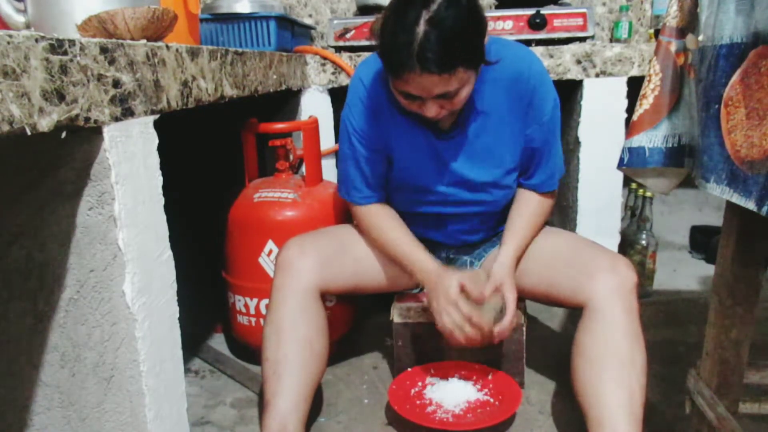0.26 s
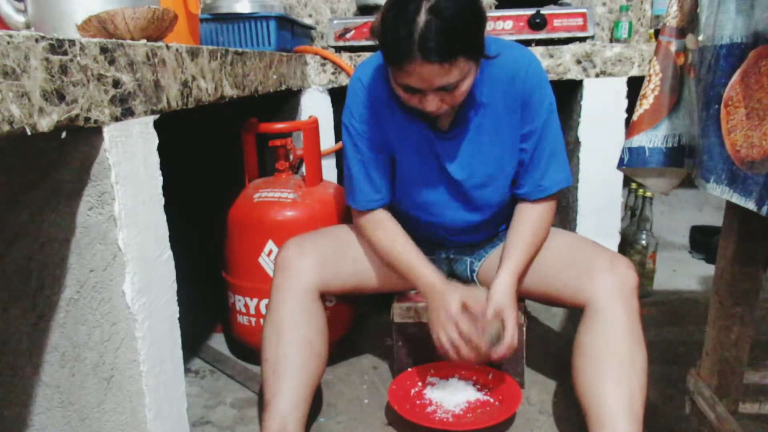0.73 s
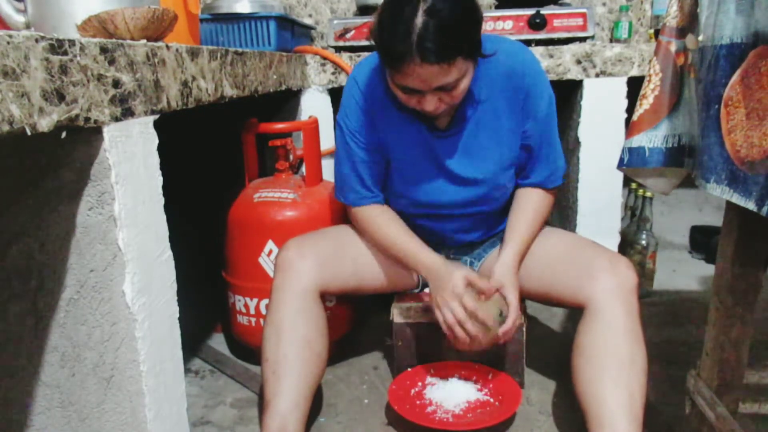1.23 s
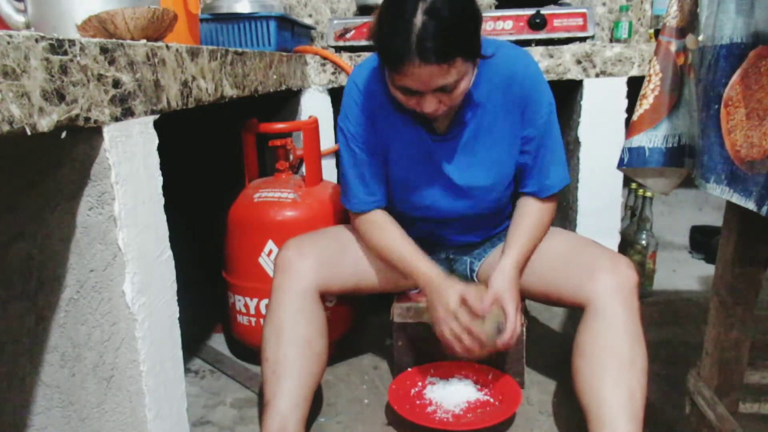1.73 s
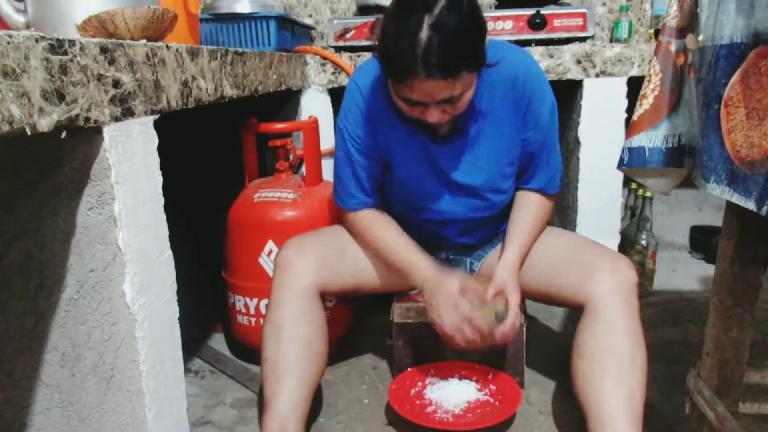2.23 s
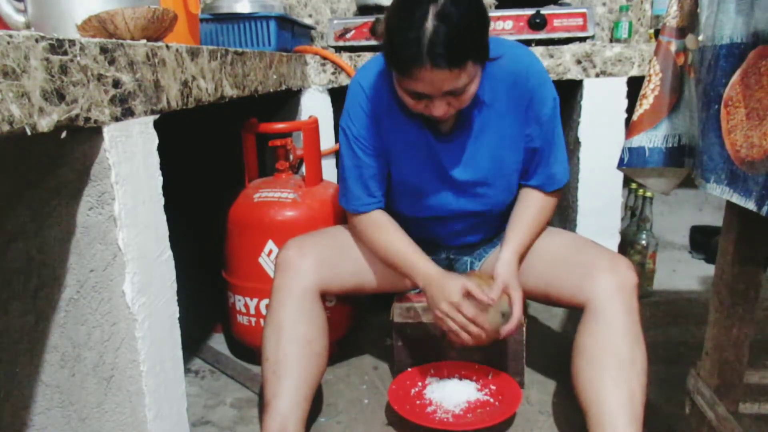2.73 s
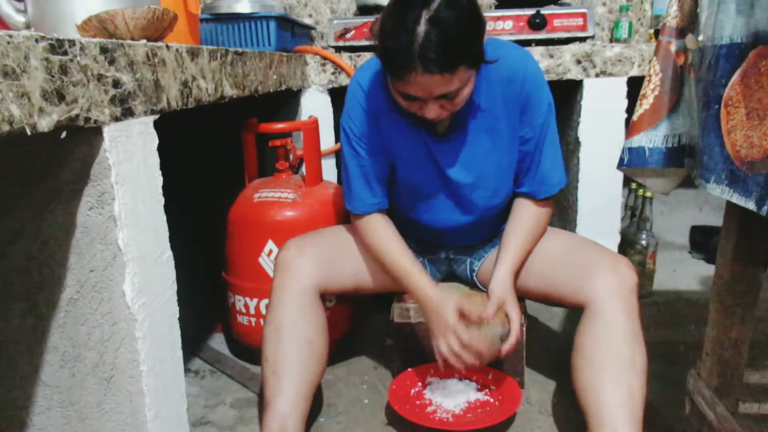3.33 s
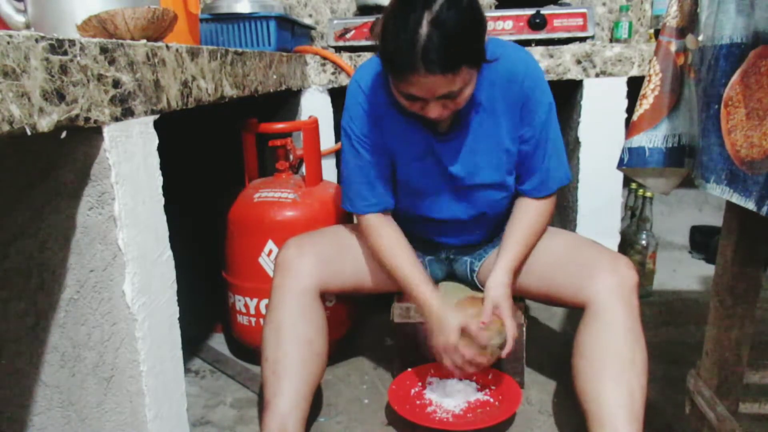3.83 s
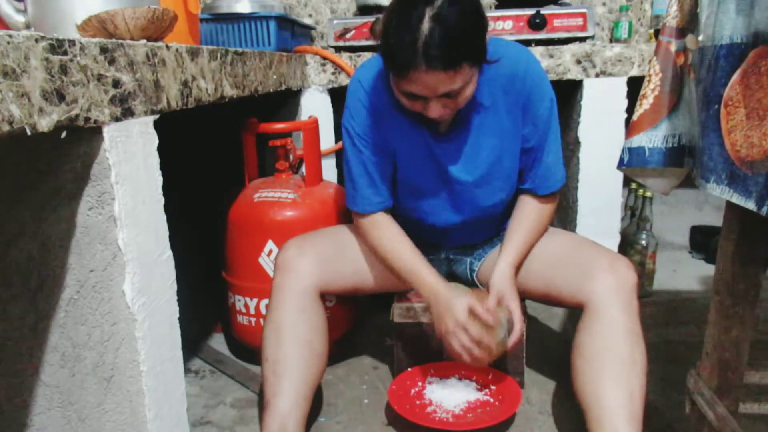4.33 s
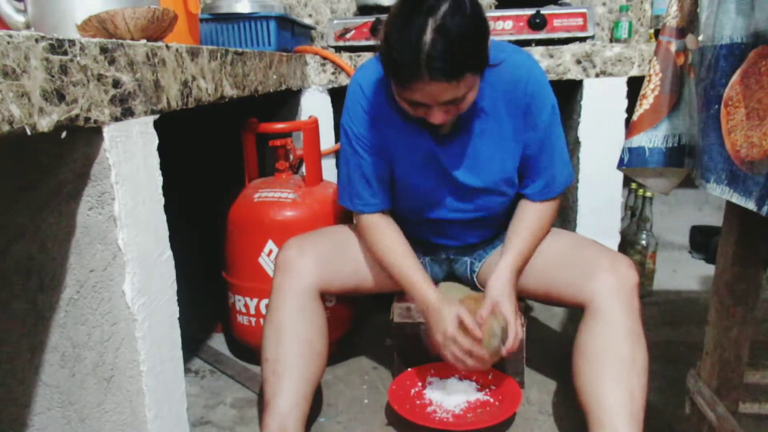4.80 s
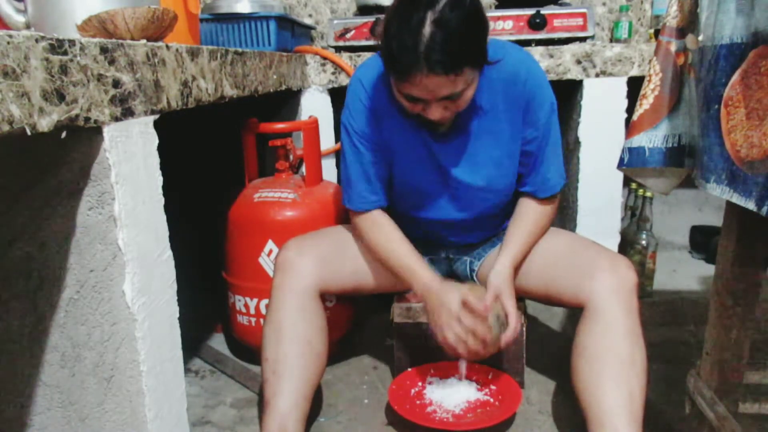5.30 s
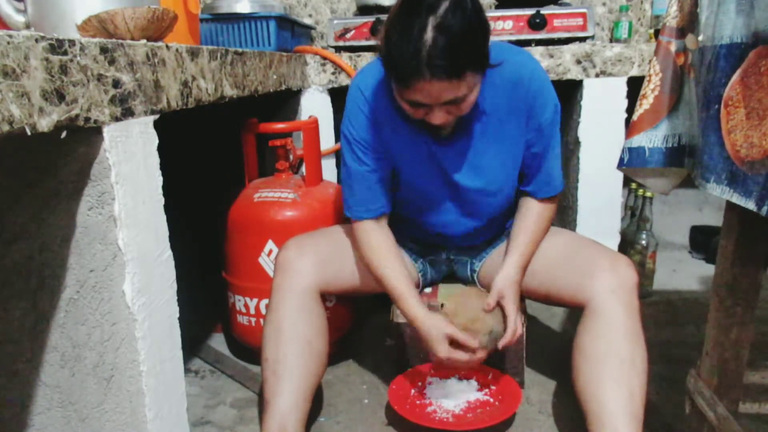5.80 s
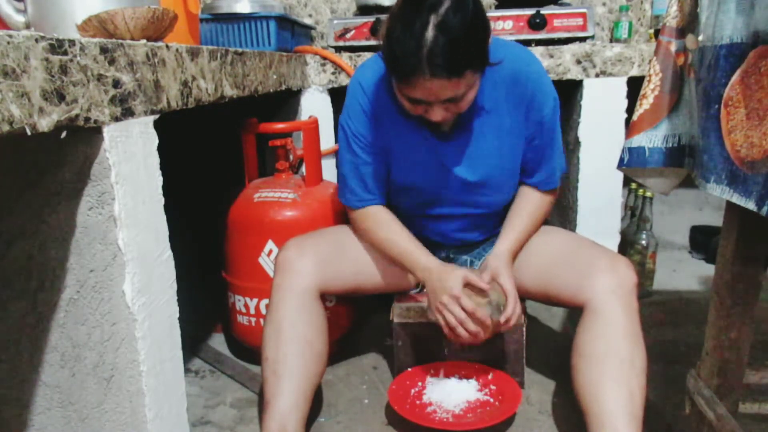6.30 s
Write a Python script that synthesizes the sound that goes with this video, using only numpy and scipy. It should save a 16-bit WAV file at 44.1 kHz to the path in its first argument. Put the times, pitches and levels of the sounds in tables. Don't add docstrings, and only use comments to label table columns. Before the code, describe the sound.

From 0 to 0.2 seconds, faint rubs and a small knock as a halved coconut is set on a toothed blade. Then firm scrapes at about 0.25, 0.55 and 0.85 seconds, each roughly an eighth of a second: a quick catch, a swelling gritty rasp with hollow shell tone and low woody stool thrum, then a fast release. Sharp snags crack within many strokes. Around 1.1 seconds the nut is turned with light rubs and knocks. Further groups of three start near 1.25, 2.2, 3.15, 4.15 and 5.1 seconds, with loose knocking between, clearest around 4.05. The strokes near 3.2 to 3.5 are among the strongest; those around 2.5 are lighter. Two last scrapes come at 6.05 and 6.35. A small hard kitchen echoes briefly; faint hiss, distant traffic rumble and short, fuzzy, high insect calls lie behind. The close microphone has little bass.

```python
import sys
import numpy as np
from scipy import signal
from scipy.io import wavfile
from scipy.ndimage import uniform_filter1d

SR = 44100
rng = np.random.default_rng(int(sys.argv[2]) if len(sys.argv) > 2 else 0)


def volts_from_db(level):
    exponent = np.asarray(level, float) / 20
    return 10 ** exponent


def output_pcm(signal):
    pcm = np.clip(np.atleast_2d(signal).T, -1, 1) * 32767
    wavfile.write(sys.argv[1], SR, np.round(pcm).astype(np.int16))


N = 288855


def grating():
    shell_hz, stool_hz = grip()
    return shell_bite(shell_hz) + stool_thrum(stool_hz) + tearing() + blade_pings() + nut_knocks()


# (frequency [Hz], width [Hz], level [dB])
SHELL_MODES = [(656.5, 71, -2), (766.7, 38, -2.5), (865, 86, -2), (898, 21, -1.5), (946, 24.4, -1.5),
               (1012.6, 88, -5.5), (1135, 27, -8), (1263.6, 31, -7.5)]
# (lead [s], share of touch dip [1], easing [dB/s], let-go drop [dB], release [dB/s])
BITE_WAY = (0.00089, 1.1, 69, 1.45, 257)


def shell_bite(favoured_hz):
    press = force(BITE_WAY, np.zeros(len(STROKES)), np.zeros(len(TURNS)))
    slip = chatter(hz=71.5, depth_db=1.5) * slips(900, spread_db=1.5)
    bite = volts_from_db(-3.5) * press * slip + strike(PEAK_DB, signal.windows.hann(5))
    return body(bite, SHELL_MODES, favoured_hz, lean_db=14.0)


# (frequency [Hz], width [Hz], level [dB])
STOOL_MODES = [(187.4, 113, -11.5), (253.9, 39, -1.5), (290, 39.3, -3), (336.7, 50.5, -6.5),
               (365, 49, -5.5), (443.5, 60, -8.5), (533, 63, -8.5)]
# (lead [s], share of touch dip [1], easing [dB/s], let-go drop [dB], release [dB/s])
THRUM_WAY = (.003, 0.81, 65, 1.4, 285)


def stool_thrum(favoured_hz):
    thrum = force(THRUM_WAY, np.transpose(HOLDS)[2], np.transpose(TURNS)[3])
    slip = chatter(hz=29.8, depth_db=1) * slips(1500, spread_db=1.0)
    thumps = strike(PEAK_DB + THUMP_DB + 3.0, signal.windows.hann(5))
    shove = volts_from_db(2.0) * thrum * slip + thumps
    stool = filtered(body(shove, STOOL_MODES, favoured_hz, lean_db=8.5), 2, 170, "high")
    legs = volts_from_db(-30) / 15 * resonate(resonate(shove, 82, 78), 82, 78)
    return stool + legs


# (frequency [Hz], density [dB/Hz])
TEARING_SPECTRUM = [(700, -14.5), (1400, 2.5), (2600, -4.5), (3300, -4.5), (5500, -8.5), (8000, -7),
                    (11600, -18), (15500, -25.5)]
# (frequency [Hz], width [Hz], lift over tearing [dB])
BLADE_MODES = [(2150, 130, 5.5), (2626, 740, 8), (3630, 340, 3), (4362, 264, 8), (5920, 1100, 3),
               (14050, 3600, 13.5)]
# (lead [s], share of touch dip [1], easing [dB/s], let-go drop [dB], release [dB/s])
HISS_WAY = (-0.0079, .95, 52, 4.5, 215)
TEAR_ON_S = [-.005, 0.0027, 0.015, -0.0054, 0.0081, 0.0045, 0.00038, 0.0016, 0.0056, 0.016, -0.00046,
             -0.000075, 0.005, -0.0041, 0.000037, 0.0012, 0.0069, 0.00028, 0.013, 0.0016]


def tearing():
    stroke_db, rub_db = np.transpose(HOLDS)[3], np.transpose(TURNS)[4]
    hiss = force(HISS_WAY, stroke_db, rub_db, touch_s=0.0088, longer_s=TEAR_ON_S)
    tear = volts_from_db(-2.0) * hiss * chatter(hz=57.7, depth_db=1.43) * slips(12000, spread_db=-0.5)
    crackle = rng.standard_normal(1500) * np.exp(-np.arange(1500) / SR / 0.0059)
    dull = signal.lfilter(*signal.butter(2, 4520, fs=SR), crackle)
    cracks_db = PEAK_DB + CRACK_DB
    cracks = strike(cracks_db - 7.5 + SNAGS_ONLY_DB, crackle) + strike(cracks_db - 5.5 + KNOCKS_ONLY_DB, dull)
    return colour(teeth(tear, hiss, patch_db=2.5) + cracks, TEARING_SPECTRUM, BLADE_MODES)


def teeth(x, level, patch_db):
    fizz_per_db, firm_db = -0.12, -32
    hz, t, z = signal.stft(x, SR, nperseg=256, noverlap=192)
    patches = rng.standard_normal(z.shape[::-1])
    patches = uniform_filter1d(patches, size=11, axis=0)
    patches = evened(uniform_filter1d(patches, size=2, axis=1)).T
    level_db = 20 * np.log10(np.interp(t, np.arange(N) / SR, level) + .001)
    octaves = np.clip(np.log2((hz + 1) / 4500), 0, 1.3)
    tilt_db = np.outer(octaves, fizz_per_db * (level_db - firm_db))
    return signal.istft(z * volts_from_db(patch_db * patches + tilt_db), SR, nperseg=256, noverlap=192)[1][:N]


def blade_pings():
    out = np.zeros(N + 1500)
    for s, peak_db, _, crack_db, hz in BLOWS:
        out[round(s * SR):][:1500] += volts_from_db(peak_db + crack_db - 8) * damped(hz, .0025)
    return out[:N]


# (frequency [Hz], level [dB], decay [s])
LOOSE_NUT = [(474, -9.5, 0.0093), (942, -13.5, 0.01)]


def nut_knocks():
    t = np.arange(4000) / SR
    hollow = sum(volts_from_db(db) * np.exp(-t / decay) * np.sin(2 * np.pi * hz * t) for hz, db, decay in LOOSE_NUT)
    shell = strike(PEAK_DB - 8.5, damped(925, 0.0017))
    stool = strike(PEAK_DB + THUMP_DB - 3.5, damped(347, 0.0022))
    return shell + stool + strike(PEAK_DB + KNOCKS_ONLY_DB, hollow)


# (time [s], peak [dB], thump over peak [dB], crack over peak [dB], tooth [Hz])
SNAGS = [(0.313, 0, -6, -13.5, 2140), (0.609, -7, -2, -21, 2150), (0.896, -2.5, -6.5, -16, 2150),
         (1.336, 3.5, -22, -17, 2720), (1.87, -1, -11, -17, 2270), (2.266, 1, -29, -34, 2240),
         (2.282, -14.5, -17, -3, 2680), (2.29, 1.5, -7, -11.5, 2750), (2.297, -1, -10.5, -28, 2170),
         (2.832, -3.5, -12.5, -32, 2710), (3.205, -4, -18, -19, 4270), (3.22, 1, -22, -21, 2120),
         (3.237, -4.5, -2, -25, 2050), (3.501, -5.5, -10.5, -24, 2080), (3.547, -1.5, -15, -20, 2150),
         (3.822, -3.5, -22, -15, 2150), (3.849, 2.5, -11.5, -15, 1930), (4.24, 0.5, -12, -19.5, 2150),
         (4.508, -5, -11, -24, 2120), (5.144, -11.5, 1, -11, 4276), (5.449, 0, -6.5, -25, 2700),
         (6.086, -5, -6, -21, 2170), (6.404, 2, -23, -22, 2260), (1.281, -5.5, -9, -16, 4200)]
# (time [s], peak [dB], thump over peak [dB], crack over peak [dB], # tooth
# [Hz])
KNOCKS = [(0.13, -34, 8.5, -9, 2440), (1.132, -32.5, 1, -7.5, 2160), (2.11, -33, 7, -7, 2940),
          (2.16, -26.5, 2.5, -4, 3300), (2.804, -25, -6, -4, 3000), (3.084, -36, 2, -15, 3840),
          (4.053, -24, -7, -1.5, 4400), (4.059, -12.5, -15, -10.5, 3700), (4.071, -18.5, -10, -7.5, 2620),
          (4.144, -40, 11, -10, 2680), (4.972, -44, 8, 9.5, 2300), (5.004, -22.5, 7.5, -11.5, 3590),
          (5.679, -29, -4, -3, 2600), (0.869, -16, -5, -16, 2200), (1.7, -24, 3, -5, 4400),
          (3.772, -33, 6, -6, 2600), (6.352, -34, -12, -21, 2700), (5.948, -36, 7.5, -4, 3200),
          (5.02, -30, -14, -11, 3700), (4.771, -12, -1, -18, 1900), (0.277, -11, -1.5, -16, 4300),
          (1.566, -9.5, -13, -18, 2200), (4.19, -14, -8, -18, 2200)]
BLOWS = [*SNAGS, *KNOCKS]
BLOW_S, PEAK_DB, THUMP_DB, CRACK_DB, _ = np.transpose(BLOWS)
SNAGS_ONLY_DB = -200 * (np.arange(len(BLOWS)) >= len(SNAGS))
KNOCKS_ONLY_DB = -200 - SNAGS_ONLY_DB


def strike(levels_db, blow):
    at = np.zeros(N)
    at[np.round(BLOW_S * SR).astype(int)] = volts_from_db(levels_db)
    return signal.oaconvolve(at, blow)[:N]


# (touch time [s], build-up [s], cut end after touch [s], full pressure [dB], touch dip [dB])
STROKES = [(0.245, 0.045, 0.14, -15.5, 18), (0.536, 0.061, 0.12, -14.5, 17),
           (0.834, 0.056, 0.12, -14.5, 11.5), (1.238, 0.056, 0.13, -14, 21), (1.519, 0.1, 0.12, -13.5, 18),
           (1.795, 0.091, 0.11, -14, 14.5), (2.219, 0.053, 0.12, -16.3, 15.5),
           (2.518, 0.041, 0.11, -17.5, 16.5), (2.797, 0.026, 0.099, -16.5, 17),
           (3.169, 0.047, 0.12, -12.5, 18.5), (3.468, 0.072, 0.12, -11.5, 24),
           (3.759, 0.08, 0.095, -13, 21.5), (4.166, 0.059, 0.13, -15.5, 13.5),
           (4.438, 0.079, 0.14, -16, 24.5), (4.724, 0.054, 0.11, -13, 20.5),
           (5.096, 0.077, 0.13, -13.5, 21.5), (5.388, 0.057, 0.11, -15, 14.1),
           (5.659, 0.042, 0.094, -18, 8.5), (6.054, 0.088, 0.11, -13, 14), (6.338, 0.058, 0.119, -13, 11)]
# (time [s], length [s], pressure [dB], thrum over pressure [dB], hiss over it [dB])
TURNS = [(0.0, 0.0081, -43, -1, -9), (0.124, 0.073, -55.5, 6, 7), (0.207, 0.034, -44, 6, -8),
         (1.122, 0.019, -40.5, -1, -4), (1.195, 0.025, -37.5, -10, -10.5), (2.1, 0.07, -32.5, -2, -8.5),
         (3.068, 0.044, -44, 6, -1.5), (3.129, .06, -39.5, 2, -4.5), (4.05, 0.0099, -21.5, -6, -13),
         (4.102, 0.032, -50, 4, 1), (4.997, .05, -37, 1, -7), (5.935, 0.093, -43, 1, -3)]


def force(way, stroke_db, rub_db, touch_s=0.014, longer_s=np.zeros(len(STROKES))):
    lead, share, ease, drop_db, release = way
    total = np.zeros(N)
    for (s, build, cut, db, dip_db), over_db, extra in zip(STROKES, stroke_db, longer_s):
        total += push(s - lead, touch_s, build, cut + extra, db + over_db, share * dip_db, ease, drop_db, release)
    for (s, length, db, _, _), over_db in zip(TURNS, rub_db):
        total += push(s, 0.003, 0, length, db + over_db, 0, 59, 0, 360)
    return total


def push(start, touch, build, cut, top_db, dip_db, ease, drop_db, release):
    touch_rise_db, build_bow, let_go_s = 21, 0.61, 0.018
    build = max(build, touch + .001)
    cut = max(cut, build + .001)
    touch_db, end_db = top_db - dip_db, top_db - ease * (cut - build)
    freed_db = end_db - drop_db
    s = [-.001, 0, touch, (touch + build) / 2, build, cut, cut + let_go_s, cut + 1]
    db = [-200, touch_db - touch_rise_db, touch_db, touch_db + build_bow * dip_db, top_db,
          end_db, freed_db - release * let_go_s, freed_db - release]
    out, first = np.zeros(N), max(int(start * SR) - 50, 0)
    span = np.arange(first, min(first + SR // 2, N))
    out[span] = volts_from_db(np.interp(span / SR - start, s, db))
    return out


# (shell pitch [Hz], stool pitch [Hz], thrum over pressure [dB], hiss over pressure [dB])
HOLDS = [(930, 290, -5, -8.5), (940, 390, -4.5, -8), (874, 330, -4, -9), (910, 292, -2.3, -8.5),
         (870, 280, -3.6, -9), (950, 310, -5.5, -9.4), (980, 280, -6.5, -9), (900, 313, -3, -9),
         (894, 353, -2.5, -8.5), (875, 333, -1.5, -10.5), (886, 356, -7, -9.5), (970, 334, -5.0, -8.5),
         (890, 286, -2.5, -9), (940, 347, -2, -6.5), (894, 313, -3.6, -9.5), (940, 240, -2.3, -8.5),
         (900, 290, -2, -9.5), (965, 313, 0.6, -6.5), (924, 316, -4.0, -8), (905, 323, -5, -8.5)]
# (shell pitch [Hz], stool pitch [Hz])
TURN_HZ = (950, 375)


def grip():
    sag = 0.064
    rows = [(s, *TURN_HZ) for s, *_ in TURNS]
    for (s, _, cut, *_), (shell_hz, stool_hz, *_) in zip(STROKES, HOLDS):
        rows.append((s, shell_hz, stool_hz * (1 + sag)))
        rows.append((s + cut, shell_hz, stool_hz * (1 - sag)))
    return curve(sorted(rows))


def slips(per_s, spread_db):
    size = volts_from_db(spread_db * np.minimum(rng.exponential(1, N), 4))
    return evened(size * rng.standard_normal(N) * (rng.random(N) < per_s / SR))


def chatter(hz, depth_db):
    swing = signal.lfilter(*signal.butter(2, hz, fs=SR), rng.standard_normal(N))
    return evened(volts_from_db(depth_db * evened(swing)))


def body(drive, modes, favoured_hz, lean_db):
    ring = np.zeros(N)
    for k, (hz, width, db) in enumerate(modes):
        held_db = db - lean_db * abs(np.log2(hz / favoured_hz))
        ring += (-1) ** k * resonate(drive * volts_from_db(held_db), hz, width)
    return ring


def resonate(x, hz, width):
    turn = np.exp(2j * np.pi * np.cumsum(hz * np.ones(N)) / SR)
    r = np.exp(-np.pi * width / SR)
    return np.sqrt(2 * (1 - r ** 2)) * (turn * signal.lfilter([1], [1, -r], x / turn)).real


def damped(hz, decay_s):
    u = np.arange(1500) / SR / decay_s
    return np.e * u * np.exp(-u) * np.sin(2 * np.pi * hz * decay_s * u)


# (frequency [Hz], t60 [s])
KITCHEN_T60 = [(200, 0.37), (1000, 0.3), (4000, 0.28), (14000, 0.096)]


def kitchen(x):
    taps = np.zeros(SR // 2)
    at = np.arange(200, SR // 2 - 20, 20)
    taps[at + rng.integers(0, 20, len(at))] = rng.choice([-1., 1.], len(at))
    hz, t, z = signal.stft(taps, SR, nperseg=256)
    f, t60 = np.transpose(KITCHEN_T60)
    band_t60 = np.interp(np.log(hz + 1), np.log(f), t60)[:, None]
    tail = signal.istft(z * volts_from_db(-60 * t / band_t60), SR, nperseg=256)[1]
    return signal.fftconvolve(x, tail / np.linalg.norm(tail))[:N]


# (time [s], length [s], level [dB])
INSECT_CALLS = [
    (0.032, 0.06, -58),
    (0.086, 0.035, -52),
    (0.225, .04, -58),
    (1.702, 0.087, -57),
    (2.018, 0.14, -59),
    (2.727, 0.072, -59),
    (4.082, .11, -59),
    (4.64, 0.058, -56),
]


def insect():
    t = np.arange(N) / SR
    calls = np.zeros(N)
    for s, length, db in INSECT_CALLS:
        calls += volts_from_db(db) * np.clip(np.minimum(t - s, s + length - t) / .012, 0, 1)
    return calls * evened(filtered(slips(4000, spread_db=1), 4, [4550, 5250], "band"))


# (frequency [Hz], density [dB/Hz])
AIR_SPECTRUM = [(18, -6), (40, -22), (70, -18), (140, -8), (300, -2), (1000, -7), (3000, -17.5),
                (8000, -21.5), (15500, -30.5)]
# (time [s], level [dB])
RUMBLE = [(0.0, -53), (0.51, -60), (0.64, -53), (0.88, -65), (1.79, -56.5), (1.93, -57), (2.57, -62),
          (2.74, -58), (3.03, -55), (3.57, -63), (3.68, -57), (4.03, -60), (5.04, -49.5), (5.69, -55.5),
          (6.04, -49.5), (6.48, -59), (6.55, -40)]


def air():
    hush = volts_from_db(-50) * colour(rng.standard_normal(N), AIR_SPECTRUM)
    low = filtered(rng.standard_normal(N), 2, [45, 120], "band")
    return hush + volts_from_db(curve(RUMBLE)[0] + 1.0) * evened(low)


def evened(x):
    return x / np.sqrt(np.mean(x ** 2) + 1e-20)


def filtered(x, order, hz, kind):
    return signal.sosfilt(signal.butter(order, hz, kind, fs=SR, output="sos"), x)


def curve(rows):
    s, *columns = np.transpose(rows)
    return [np.interp(np.arange(N) / SR, s, c) for c in columns]


def colour(x, points, bumps=()):
    hz = abs(np.fft.fftfreq(4096, 1 / SR))
    f, db = np.transpose(points)
    db = np.interp(np.log(hz + 1), np.log(f), db)
    for at, width, lift in bumps:
        db = db + lift / (1 + (2 * (hz - at) / width) ** 2)
    log_gain = np.log(volts_from_db(db))
    taps = np.fft.ifft(np.exp(np.conj(signal.hilbert(log_gain)))).real[:2048]
    return signal.oaconvolve(x, taps / np.linalg.norm(taps))[:N]


def scene():
    near = grating()
    return (near + volts_from_db(-10.0) * kitchen(near) + insect() + air())[None]


def top_cut(x):
    return signal.sosfilt(signal.butter(12, 15710, fs=SR, output="sos"), x)


def record(dry):
    thin = filtered(dry, 2, 60, "high")
    held = 1.5 * np.tanh(thin / 1.5)
    edge = signal.firwin(1501, 15020, window=("kaiser", 9), fs=SR)
    mix = signal.oaconvolve(held, edge[None], "same")
    return top_cut(mix)


dry = scene()
out = record(dry)
output_pcm(out)
```